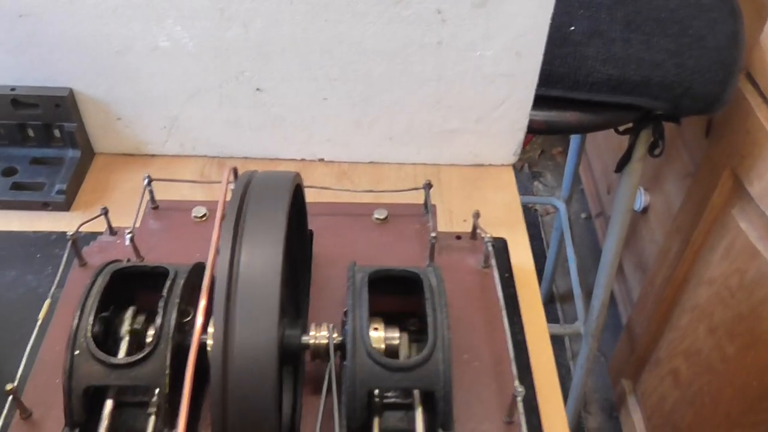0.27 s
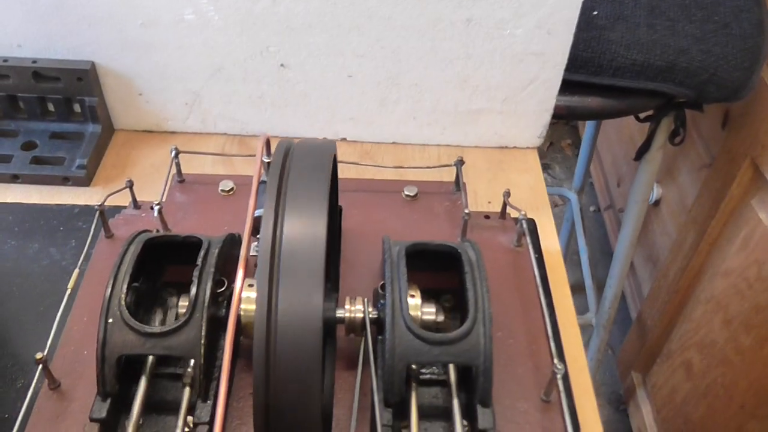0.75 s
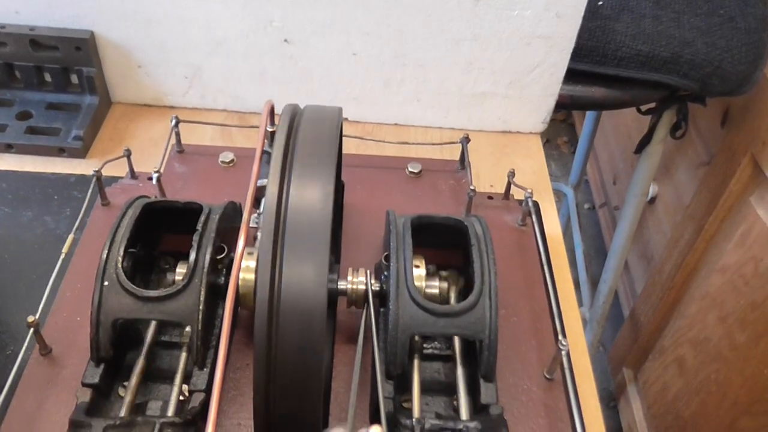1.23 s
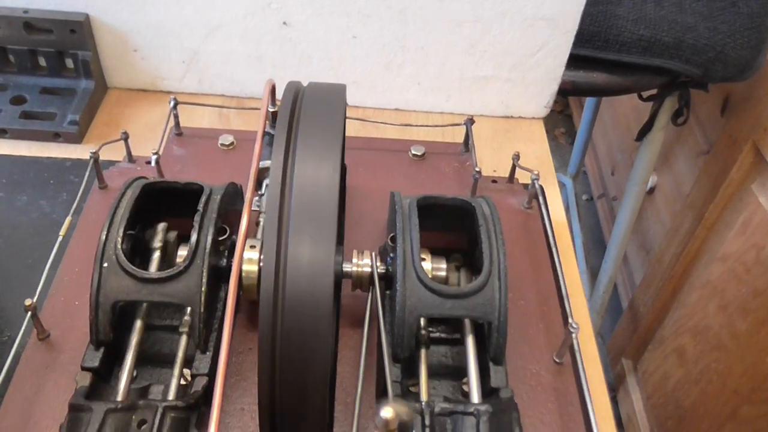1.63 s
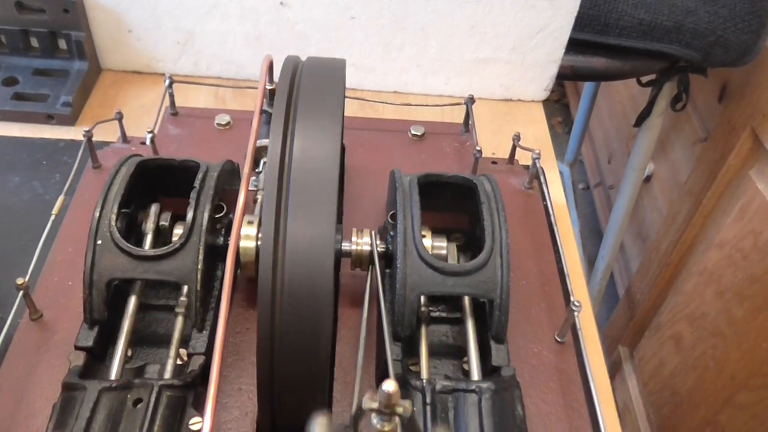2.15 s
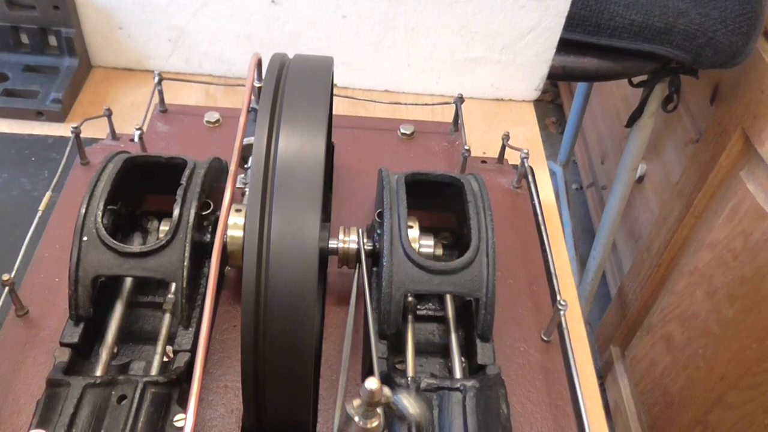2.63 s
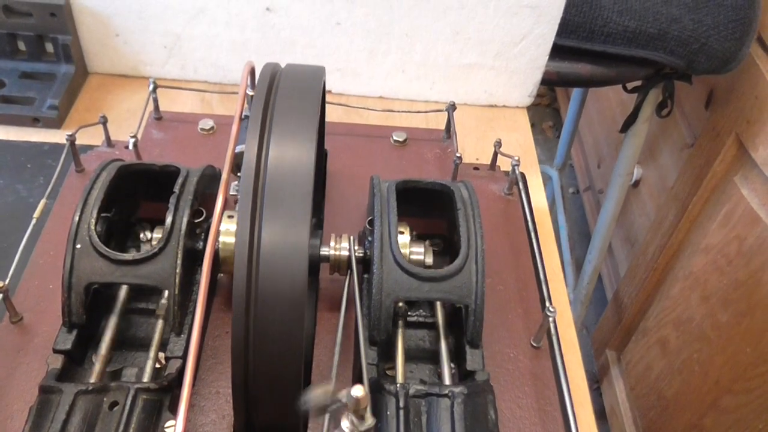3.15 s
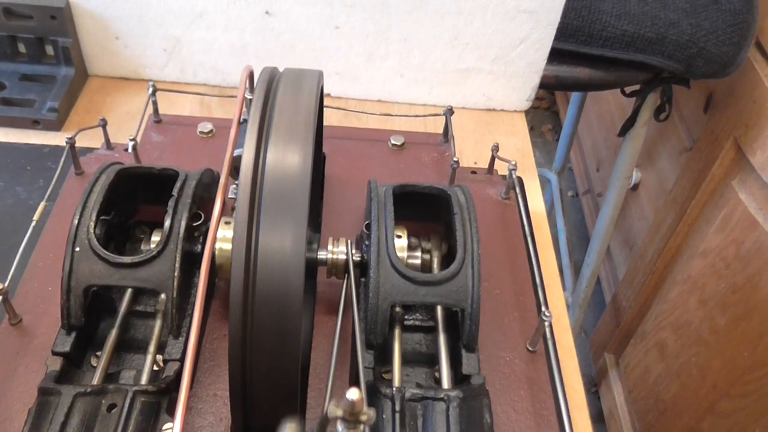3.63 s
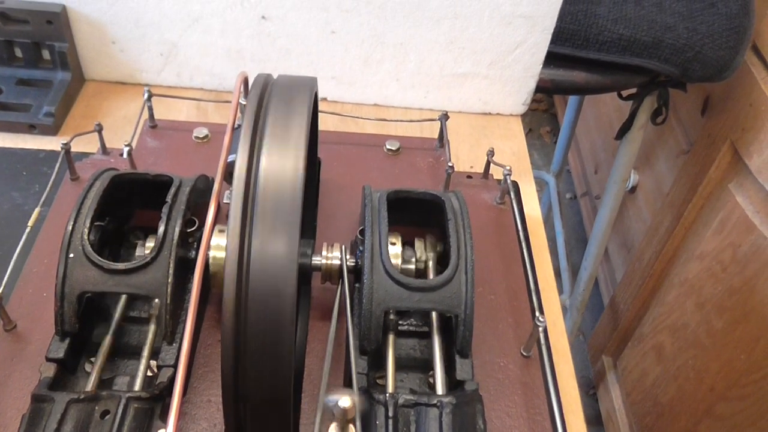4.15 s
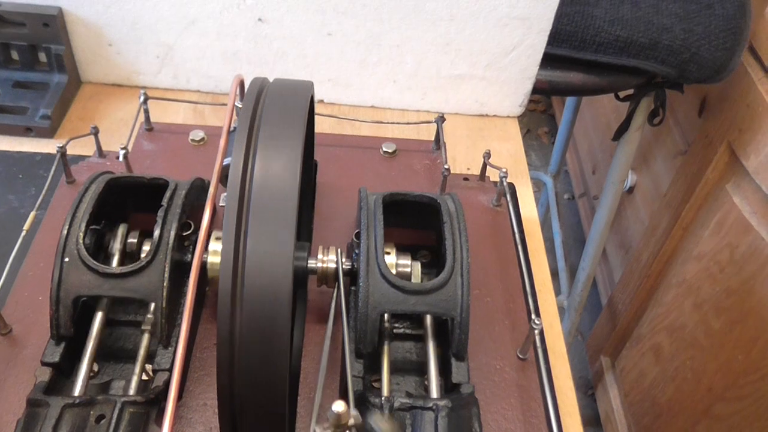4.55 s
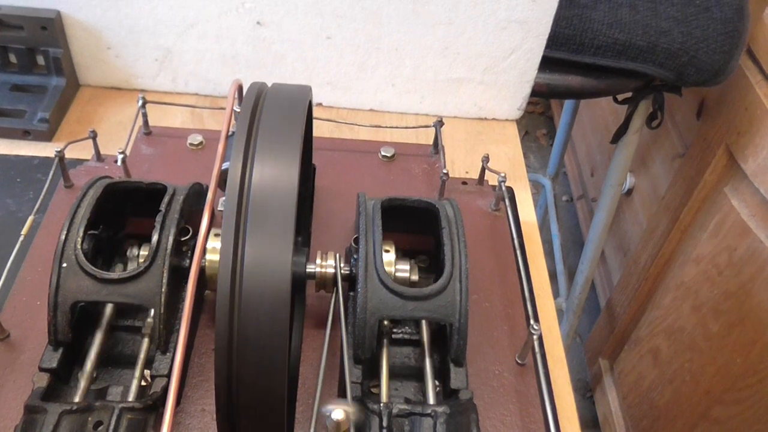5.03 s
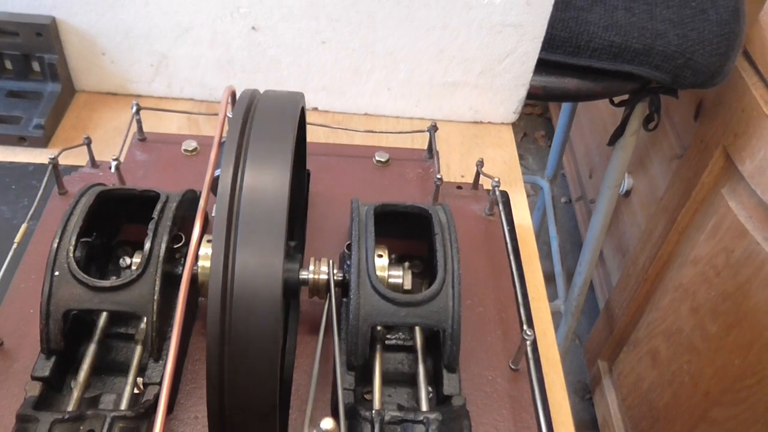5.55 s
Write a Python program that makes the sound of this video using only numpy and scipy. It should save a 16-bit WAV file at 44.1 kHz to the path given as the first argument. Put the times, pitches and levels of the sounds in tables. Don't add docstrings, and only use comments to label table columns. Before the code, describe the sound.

Steady mechanical rhythm throughout: a hard, slightly doubled knock of metal plate and bench, a lighter chattering return just past halfway, faint linkage ticks, then the next knock. Bright breathy air chuffs with each turn over constant hiss, above a buzzing pump drone and rumble. Heard close up in stereo, with very little room echo.

```python
import sys
import numpy as np
from scipy import signal
from scipy.fft import rfft, irfft, next_fast_len
from scipy.io import wavfile
from scipy.ndimage import uniform_filter1d, map_coordinates

SR = 44100
rng = np.random.default_rng(int(sys.argv[2]) if len(sys.argv) > 2 else 0)


def waveform_to_disk(signal):
    frames = np.transpose(np.atleast_2d(signal))
    scaled = np.clip(frames, -1, 1) * 32767
    samples = np.round(scaled).astype(np.int16)
    wavfile.write(sys.argv[1], SR, samples)


def attenuation_scalar(level_db):
    decades = np.asarray(level_db, float) / 20
    return 10 ** decades


N = 254898
T = np.arange(N) / SR


def unit(x):
    return x / np.sqrt(np.mean(x ** 2) + 1e-20)


def along(points, hz):
    f, value = np.transpose(points)
    return np.interp(np.log(hz + 1), np.log(f + 1), value)


def filtered(x, response):
    m = next_fast_len(N + 8192)
    return irfft(rfft(x, m) * response(np.fft.rfftfreq(m, 1 / SR)), m)[..., :N]


def wobble(rate):
    knots = rng.standard_normal(int(N * rate / SR) + 4)
    return map_coordinates(knots, [T * rate])


def noise(response, patchy_db):
    z = signal.stft(rng.standard_normal(N), nperseg=256)[2]
    field = uniform_filter1d(rng.standard_normal(z.shape), size=4, axis=0)
    field = uniform_filter1d(field, size=8, axis=1)
    patchy = signal.istft(z * attenuation_scalar(patchy_db * unit(field)), nperseg=256)[1][:N]
    return unit(filtered(patchy, response))


def add(track, s, sound):
    part = track[max(round(s * SR), 0):][:len(sound)]
    part += sound[:len(part)]


def decay(db, t60, t):
    return attenuation_scalar(db - 60 * t / t60)


def onset(rise, t):
    return 1 - np.exp(-t / rise)


def ring(hz, db, t60, rise, t):
    modes = decay(db[:, None], t60[:, None], t) * np.sin(2 * np.pi * hz[:, None] * t)
    return np.sum(modes, 0) * onset(rise, t)


def bell(x, centre, spread):
    return np.exp(-.5 * ((x - centre) / spread) ** 2)


FIRST_TURN_S, TURN_S, QUICKENS_S, TURN_COUNT = .0477, .26866, 3.85e-5, 22


def turn_times():
    k = np.arange(-1, TURN_COUNT + 1)
    return FIRST_TURN_S + TURN_S * k - QUICKENS_S * k ** 2


# (f/Hz, width/Hz, leak level/dB, exhaust level/dB)
PORT_RESONANCES = [(2820, 180, -11, -30), (3600, 170, -5, -32), (4056, 295, -1, -12), (4582, 92, 1, -6.5),
                   (4800, 72, 0.5, -12), (5050, 47, -7.5, -4), (5460, 450, -2.5, -7.5), (6000, 176, 0, -4),
                   (6390, 190, -1.5, -7), (6890, 220, -2.5, -2.5), (7650, 270, -2, -4.5),
                   (8030, 320, -0.5, -5), (8630, 250, -6.5, 0.5), (9180, 200, -7, -0.5),
                   (9560, 250, -7, -5.5), (9860, 150, -8.5, -8), (10480, 260, -13.5, -8.5),
                   (10950, 200, -15, -9.5), (11550, 200, -14.5, -7), (12080, 260, -5, -4.5),
                   (12650, 250, -13, -8), (13100, 430, -10.5, -10), (13800, 150, -17, -14),
                   (14400, 150, -21, -21), (15350, 500, -28, -21)]


def ports(column):
    def response(hz):
        power = 0
        for row in np.array(PORT_RESONANCES):
            detuning = (hz - row[0]) / (row[1] / 2)
            power = power + attenuation_scalar(2 * row[column]) / (1 + detuning ** 2) ** 1.1
        return np.sqrt(power) * (hz > 1500)
    return response


# (share of turn, spread/turn, level/dB)
PRESSURE_SAGS = [
    (.15, 0.037, -1.5),
    (.4, 0.021, -2.5),
    (.9, 0.027, -4.5),
]
# (f/Hz, spread/Hz, level at start/dB, drift/(dB/s))
LEAK_WHISTLES = [(5980, 160, -42.5, -1.2), (4655, 120, -51, 1.5)]


def leak(angle):
    sag_db = sum(db * bell(angle, share, spread) for share, spread, db in PRESSURE_SAGS)
    gain = attenuation_scalar(-32.0 + sag_db + 0.14 * wobble(2.42) + 0.26 * wobble(24.94))
    sound = gain * noise(ports(column=2), patchy_db=1.64)
    for centre, spread, db, drift_db in LEAK_WHISTLES:
        breath = noise(lambda hz: bell(hz, centre, spread), patchy_db=1.0)
        sound += attenuation_scalar(db + drift_db * T + sag_db) * breath
    return sound, gain


PUFF_RISES_DB_PER_TURN = 650


def valve_db(angle, opens, shuts, db, dies_db):
    since = (angle - opens) % 1
    fall_db = dies_db * np.maximum(since - (shuts - opens), 0)
    rise_db = PUFF_RISES_DB_PER_TURN * (1 - since)
    return db - np.minimum(fall_db, rise_db)


# (opens/turn, shuts/turn, level/dB, decay/(dB/turn))
PUFFS = [
    (0.997, 1.003, 1, 170),
    (0.31, 0.339, -1.5, 430),
    (.36, .58, -9, 100),
    (0.594, 0.608, 0.5, 60),
    (.6, 0.798, -3, 36),
    (.81, 0.83, -1, 150),
]
LONG_STROKE = (.6, 0.9, -4.5, 200)
# (f/Hz, spread/Hz)
THROAT = (7800, 720)


def exhaust(angle):
    flow_db = -30 + 0.23 * T + wobble(40)
    gain = attenuation_scalar(flow_db + np.max([valve_db(angle, *row) for row in PUFFS], axis=0))
    throat_idle_db = -23
    swell = attenuation_scalar(flow_db + np.maximum(valve_db(angle, *LONG_STROKE), throat_idle_db))
    colour = ports(column=3)
    throat = noise(lambda hz: colour(hz) * bell(hz, *THROAT), patchy_db=1)
    return gain * noise(colour, patchy_db=1) + swell * throat, gain


# (f/Hz, level/dB)
JET_SIDE = [(1470, -48), (2500, -19), (2960, -31), (3400, -3.5), (3870, -11), (4250, -2.5), (5030, -5),
            (5430, -6), (6280, -9), (6840, -24), (7730, -12), (9150, -1), (12400, -7.5), (14200, -32),
            (15700, -25)]


def air():
    starts = turn_times()
    angle = np.interp(T, starts, np.arange(len(starts))) % 1
    leak_sound, leak_gain = leak(angle)
    puff_sound, puff_gain = exhaust(angle)
    apart = noise(lambda hz: attenuation_scalar(along(JET_SIDE, hz)), patchy_db=-1.0)
    return leak_sound + puff_sound, (attenuation_scalar(-11.5) * leak_gain + attenuation_scalar(-20.0) * puff_gain) * apart


PUMP_HZ, MAINS_HZ = 24.289, 100.095
# (multiple, rms level/dB, polarity)
STROKES = [(2, -68, 1), (3, -55, 1), (4, -47, 1), (5, -42, 1), (6, -58, 1), (7, -28, 1), (8, -32, 1),
           (9, -33, 1), (10, -39, -1), (11, -43, -1), (12, -52, 1), (13, -51, 1), (16, -50, 1),
           (47, -54, 1), (48, -48, 1)]
# (hum multiple, stroke multiple, rms level/dB, polarity)
HUM = [(1, 0, -44, 1), (1, 1, -40, -1), (1, 2, -45, 1), (1, 3, -50, 1), (1, 5, -42, -1), (1, 6, -55, 1),
       (1, 7, -53, 1), (2, -3, -56, 1), (2, -2, -51, -1), (2, -1, -42, 1), (2, 0, -34, 1), (2, 1, -38, 1),
       (2, 2, -51, 1), (2, 3, -52, 1), (2, 4, -49, 1), (3, -4, -46, -1), (3, -1, -44, 1), (3, 0, -44, -1),
       (3, 3, -53, 1)]


def motor_lines():
    sway = attenuation_scalar([0.7 * wobble(3.15) for family in range(4)])
    out = np.zeros(N)
    for m, k, db, sign in [(0, *row) for row in STROKES] + HUM:
        order = k + m * MAINS_HZ / PUMP_HZ
        lag = 1.03 * (order - 7) + .365 * (order - 7) ** 2
        line = np.sqrt(2) * np.cos(2 * np.pi * PUMP_HZ * order * T - lag)
        out += sign * attenuation_scalar(db) * sway[m] * line
    return out


# (f/Hz, level/dB)
RUMBLE = [(20, -33), (60, -30), (120, -11.5), (170, -2), (220, 1.5), (280, -3.5), (540, -2), (740, -9.5),
          (910, -6.5), (1010, -17), (1190, -8), (1600, -16.5), (2100, -18.5), (2560, -37), (3400, -54),
          (6000, -80)]
# (f/Hz, level/dB)
RUMBLE_SIDE = [(18, -47), (30, -14), (119, -21), (177, -5), (282, 0), (1040, -8), (1400, -5), (2200, -15),
               (2600, -56), (3380, -86), (5720, -120)]


def pump():
    rumble = noise(lambda hz: attenuation_scalar(along(RUMBLE, hz)), patchy_db=2.5)
    rumble_side = noise(lambda hz: attenuation_scalar(along(RUMBLE_SIDE, hz)), patchy_db=1.2)
    mid = motor_lines() + attenuation_scalar(-31.0 + 0.55 * wobble(9)) * rumble
    return mid, attenuation_scalar(-45.5) * rumble_side


# (share of turn, level/dB, t60/s)
TAPS = [
    (.925, -25, 0.039),
    (0.965, -28, 0.045),
    (0.217, -42, 0.059),
    (.3, -44, 0.024),
    (.8, -43, 0.041),
]
# (f/Hz, level/dB)
TAP_COLOUR = [(300, -34), (500, -3), (900, -8), (1300, 4), (1700, -11), (2200, -14.5), (3000, -22),
              (5000, -65)]


def taps():
    envelope, t, starts = np.zeros(N), np.arange(SR // 10) / SR, turn_times()
    for start, end in zip(starts, starts[1:]):
        for share, db, t60 in TAPS:
            burst = decay(db + rng.standard_normal(), t60, t) * onset(0.0021, t)
            add(envelope, start + share * (end - start), burst)
    return envelope * noise(lambda hz: attenuation_scalar(along(TAP_COLOUR, hz)), patchy_db=2.5)


# (f/Hz, t60/s, rise/s)
BOOM = (425, 0.1, 0.0071)


def boom(db, t):
    hz, t60, rise = BOOM
    return decay(db + 21.0, t60, t) * onset(rise, t) * np.sin(2 * np.pi * hz * t)


# (f/Hz, level/dB, t60/s)
FRAME = [(1523, 2, 0.07), (1662, -1.5, 0.095), (1874, -6.5, 0.074), (2068, -10, 0.055), (2400, -4.5, 0.063),
         (2910, -7.5, 0.043), (3400, -10, 0.025)]


def crack(out, s, db, t):
    crack_db = db - 13
    hz, frame_db, t60 = np.transpose(FRAME)
    for late in (0, .0047):
        pitch, size = rng.standard_normal((2, len(hz)))
        add(out, s + late, ring(hz * (1 + .03 * pitch), frame_db + crack_db + 0.76 + 2 * size, t60, 0.0011, t))
    add(out, s - .001, decay(crack_db + 2, 0.033, t) * rng.standard_normal(len(t)))


# (f/Hz, forward level/dB, return level/dB, t60/s)
BENCH = [(248, -25, -24, 0.19), (305, 1, -21, 0.43), (358.5, 3, 3, 0.18), (388.7, -1, -5, 0.14),
         (410.2, -10, 3, 0.22), (479.3, -1, 4.5, 0.17), (510, -1, -5.5, 0.18), (535.3, 12, 0.5, 0.18),
         (561.6, 5.5, -5, 0.11), (598, -5, -5, 0.028), (639.4, 4.5, 2, 0.069), (684.2, 2.5, -2, 0.084),
         (740.6, 7, -5.5, 0.14), (840, -10, -18, 0.12), (870.4, -2.5, -9, 0.094), (893.3, -4.5, -13, 0.11),
         (941, -8, -31, 0.24), (1083, -6, -12, 0.045), (1183, 1.5, -15, 0.06), (1262, -7.5, -18, 0.069),
         (1348, -6, -10, 0.048)]
# (t/s, forward knock level/dB, its boom level/dB, return knock level/dB)
SLACK = [(0.05, -21.5, -7.5, -28), (0.6, -20, -9, -26), (1.12, -18.5, -6, -28), (1.9, -18.5, -7, -24),
         (2.73, -19.5, -3, -25.5), (3.0, -22.5, 2, -26), (3.8, -22.5, 1.5, -26.5), (4.87, -21.5, 1, -26.5),
         (5.14, -21.5, -1.5, -25), (5.41, -19.5, -7.5, -26), (5.67, -21.5, -1.5, -27)]
# (delay t/s, level/dB)
RETURN_BOUNCES = [
    (0, 2.5),
    (.0017, 5),
    (0.0132, -6),
    (0.02, -3.5),
]
# (share of turn, level under the return knock/dB)
THUDS = [
    (.26, -14.5),
    (.75, -11),
    (.85, -16.5),
]


def knocks():
    out, t = np.zeros(N), np.arange(SR // 5) / SR
    hz, forward_db, return_db, t60 = np.transpose(BENCH)
    starts, (when, *levels_db) = turn_times()[1:], np.transpose(SLACK)
    for start, end in zip(starts, starts[1:]):
        db, boom_db, back_db = (np.interp(start, when, level_db) for level_db in levels_db)
        s = start - .00014 * (boom_db - 1)
        blow, rebound, back_scatter = rng.standard_normal((3, len(hz)))
        rebound_db = db + 0.5 + 0.51 * boom_db
        add(out, s, ring(hz, forward_db + db - .3 + blow, t60, 0.0023, t))
        add(out, s + 0.00463, ring(hz, forward_db + rebound_db + rebound, t60, 0.0012, t))
        add(out, s, boom(db + boom_db, t))
        crack(out, s, db, t)
        back = start + .566 * (end - start)
        back_modes_db = return_db + back_db
        for late, bounce_db in RETURN_BOUNCES:
            level_db = back_modes_db + bounce_db + back_scatter
            add(out, back + late, -ring(hz, level_db, 0.74 * t60, 0.0012, t))
        for share, thud_db in THUDS:
            level_db = back_modes_db + thud_db + 6.5 + 3 * rebound
            add(out, s + share * (end - s), ring(hz, level_db, 0.55 * t60, 0.005, t))
    return filtered(out, lambda f: f ** 2 / (f ** 2 + 150 ** 2))


# (f/Hz, t60/s)
ROOM = [(200, 0.058), (1000, 0.1), (4000, 0.13)]


def room(x):
    hz, t, z = signal.stft(rng.standard_normal((2, SR // 3)), SR, nperseg=256)
    tail = signal.istft(z * attenuation_scalar(-60 * t / along(ROOM, hz)[:, None]), SR, nperseg=256)[1]
    delayed = np.pad(x, (300, 0))[None]
    return signal.fftconvolve(delayed, tail / np.linalg.norm(tail[0]), axes=1)[:, :N]


# (f/Hz, left minus right level/dB)
TILT = [(60, 0.5), (150, -0.5), (380, 0.86), (950, 1), (2380, -3), (5980, -2), (15000, -3.5)]
# (f/Hz, left lead/rad)
LEAD = [(0, -0.024), (3530, 0.03), (4310, 0.058), (7670, 0.38), (9300, -1.7), (10600, 0.6), (11500, -0.1),
        (11900, 0.69), (15400, -0.31)]


def scene():
    (jet, jet_side), (hum, hum_side) = air(), pump()
    engine = taps() + knocks()
    mid, side = engine + jet + hum, jet_side + hum_side
    half = np.array([[.5], [-.5]])
    ears = filtered(mid, lambda hz: attenuation_scalar(along(TILT, hz) * half) * np.exp(1j * along(LEAD, hz) * half))
    return ears + 2 * half * side + attenuation_scalar(-19.0) * room(engine)


def top_cut(x):
    return signal.sosfilt(signal.butter(12, 15820, fs=SR, output="sos"), x)


def record(dry):
    mix = filtered(dry, lambda hz: hz < 15820)
    return top_cut(mix)


dry = scene()
out = record(dry)
waveform_to_disk(out)
```